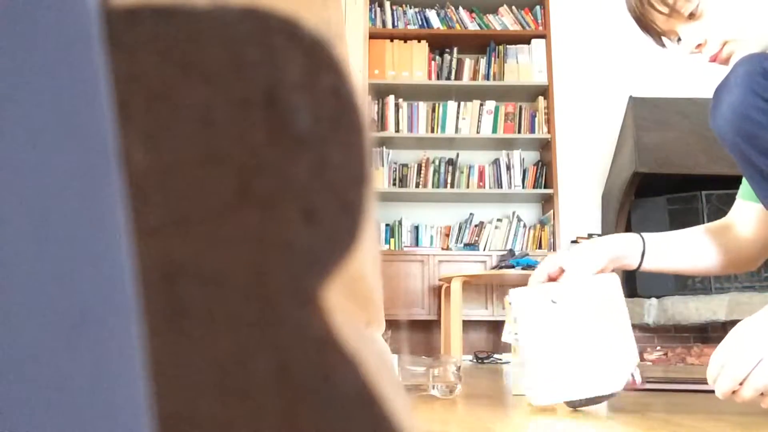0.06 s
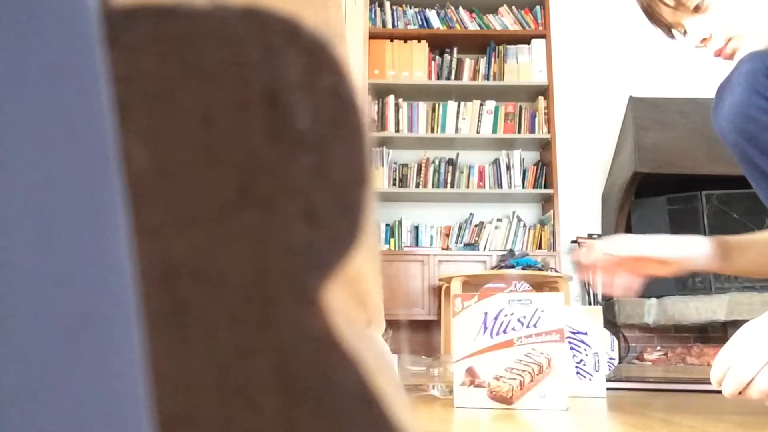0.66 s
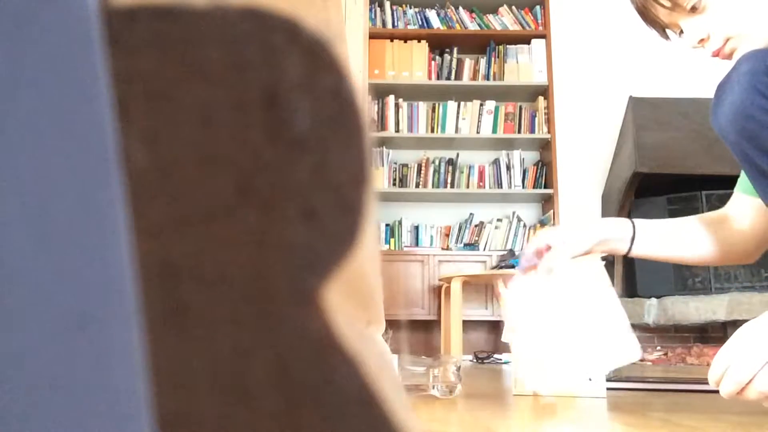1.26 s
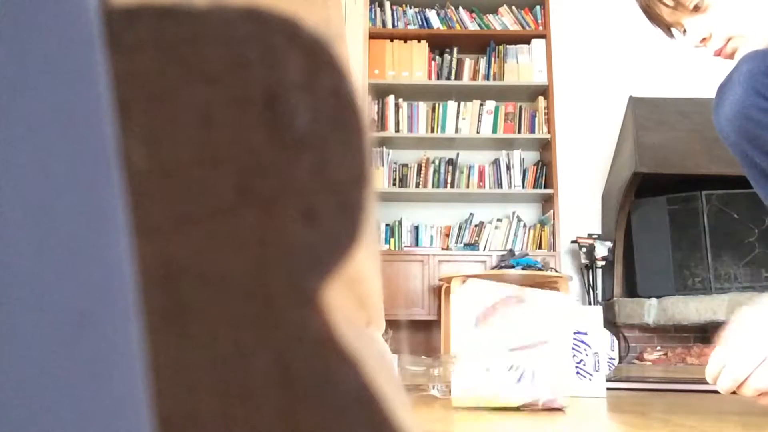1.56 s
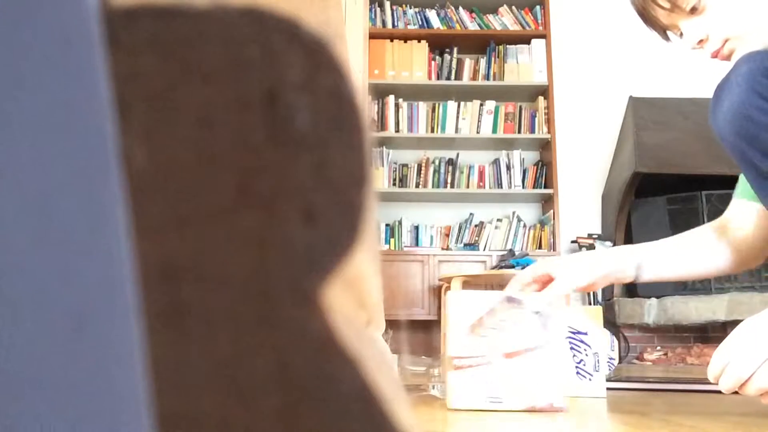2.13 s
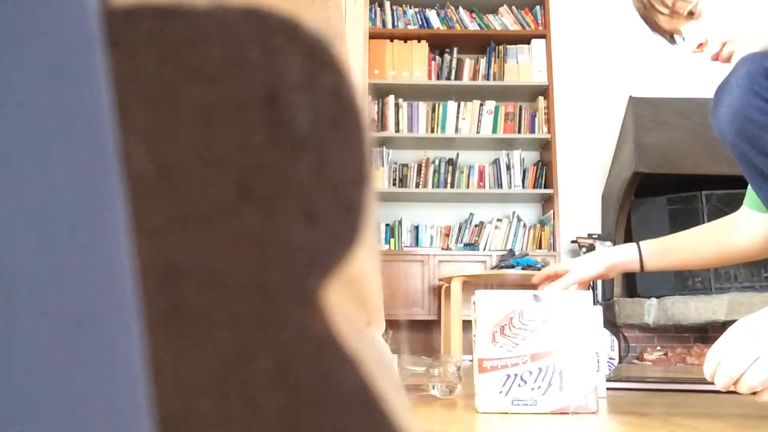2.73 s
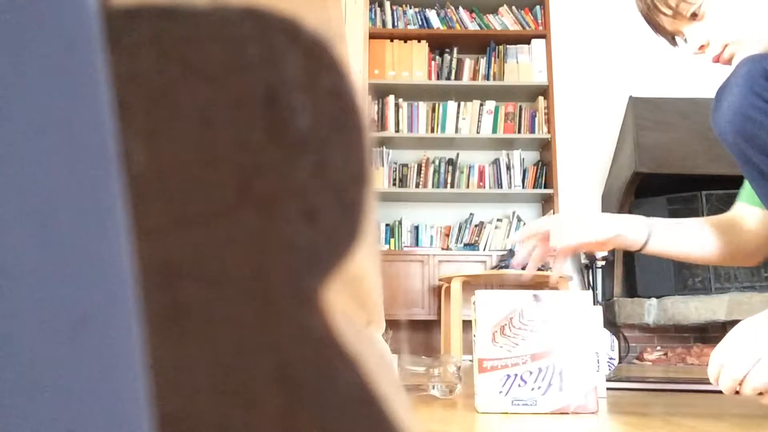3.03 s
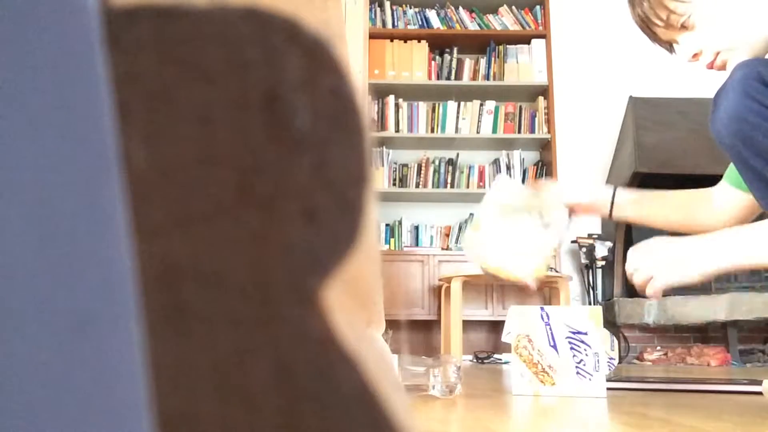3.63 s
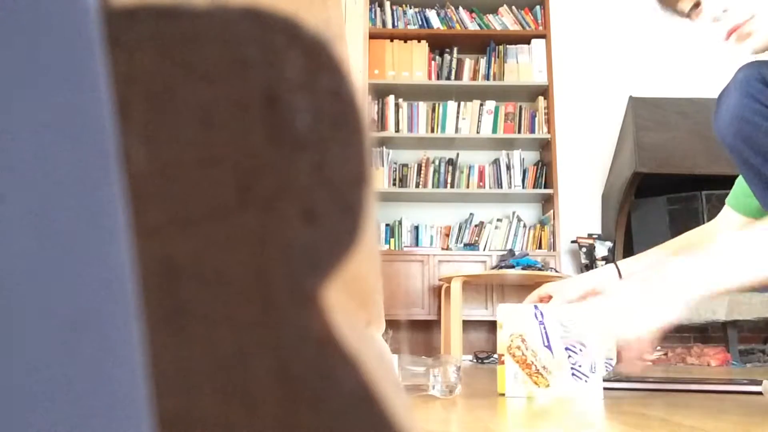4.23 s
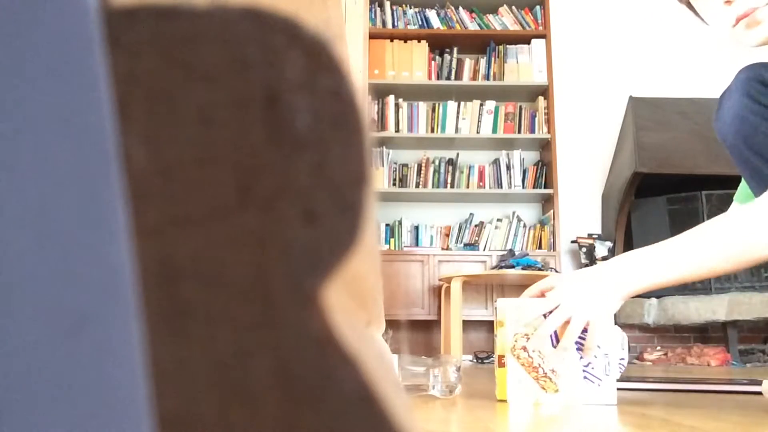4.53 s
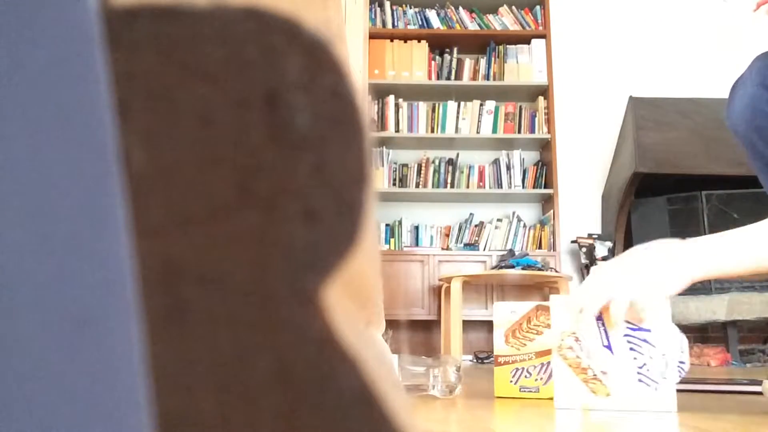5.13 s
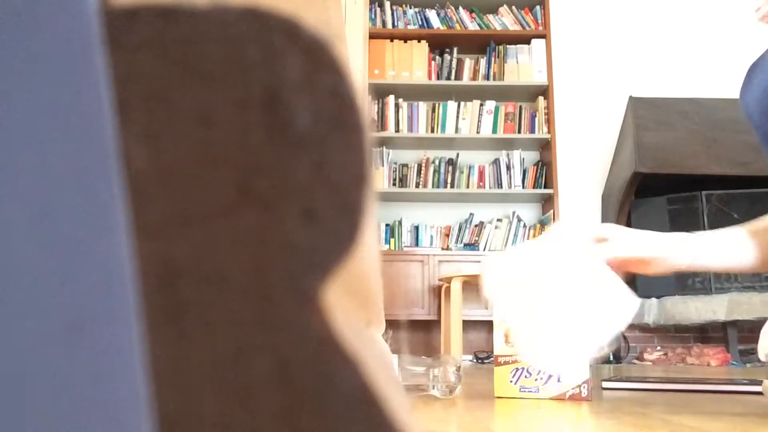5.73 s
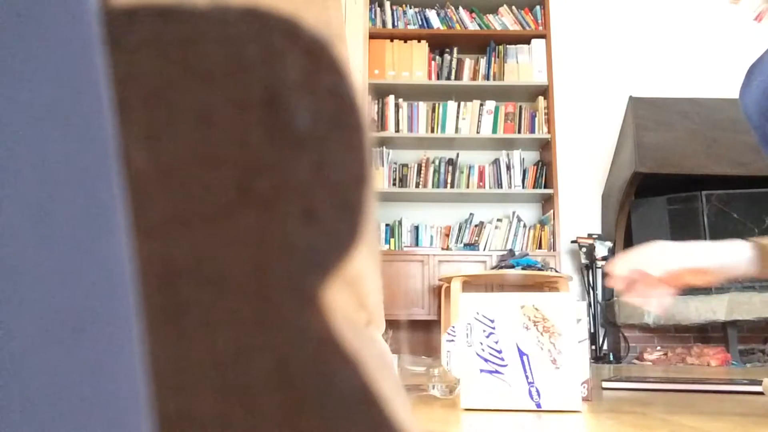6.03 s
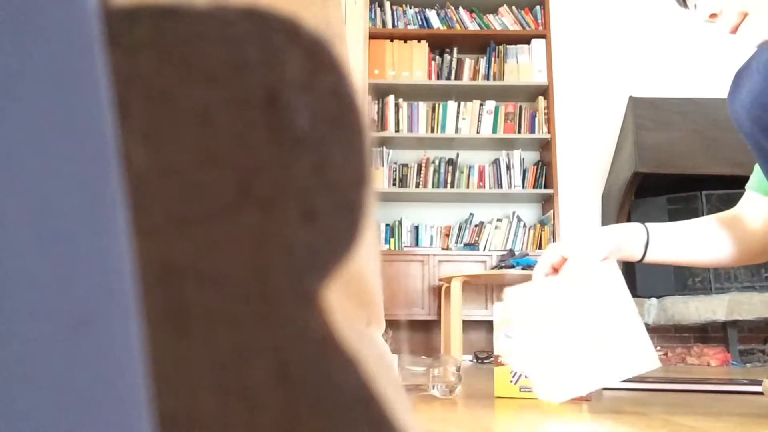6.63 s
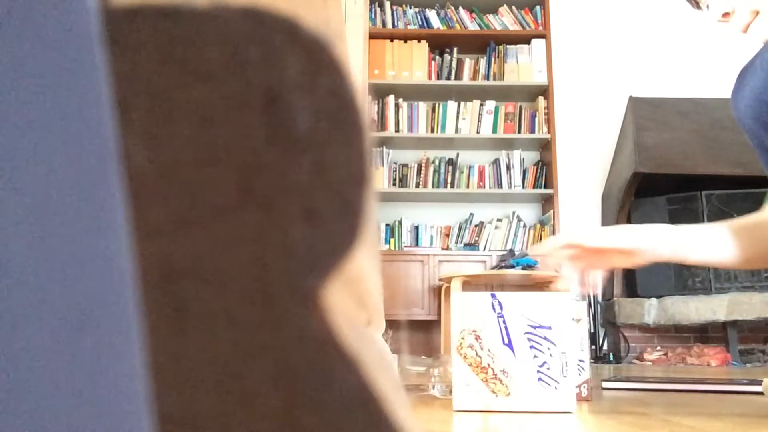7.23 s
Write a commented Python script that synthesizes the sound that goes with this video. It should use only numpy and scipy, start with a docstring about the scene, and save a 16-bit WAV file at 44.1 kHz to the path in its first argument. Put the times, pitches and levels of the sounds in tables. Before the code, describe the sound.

A cardboard box of wrapped bars clatters onto a wooden floor four times, with soft finger taps and sliding in between.

```python
"""Fingers brush and tap a cardboard box of wrapped cereal bars, then it clatters onto a wooden floor.
Each of four landings is a quick cluster of edge blows: the carton rings, the boards thump, the
wrappers crackle. In between, fingers tap and grip the box and slide it over the floor; a second box
takes over partway. A quiet living room adds a short echo and a low murmur."""
import sys
import numpy as np
from scipy import signal
from scipy.io import wavfile
from scipy.ndimage import uniform_filter1d

SR = 44100
rng = np.random.default_rng(int(sys.argv[2]) if len(sys.argv) > 2 else 0)


def master(y):
    """Save y as 16-bit WAV."""
    cut = np.clip(np.atleast_2d(y).T, -1, 1)
    pcm = np.round(cut * 32767)  # scale
    wavfile.write(sys.argv[1], SR, pcm.astype(np.int16))


N = 321048

# edges and faces meeting the floor:
# (time [s], carton [dB], contact hardness [Hz], crunch [dB], floor thump [dB], wrapper crackle [dB])
EDGE_BLOWS = [(0.4822, -14, 600, -34.5, -33.5, -43), (0.4877, -29, 1000, -31, -35, -31.5),
              (.5021, -31, 900, -33, -48, -38.5), (0.5267, -36.5, 2000, -42.5, -44, -43),
              (.5397, -22.5, 600, -40, -28.5, -40), (0.5438, -21.5, 1000, -39, -48, -49),
              (1.6118, -43.5, 2500, -45, -56, -41), (1.625, -17.5, 1700, -33.5, -30, -41.5),
              (1.6286, -15.5, 1498, -29.5, -36.5, -30.5), (1.6346, -28.5, 1200, -45, -50, -36.5),
              (1.6487, -16.5, 1300, -37.5, -31.5, -44.5), (5.9854, -18.5, 2200, -23.5, -35.5, -38),
              (5.9871, -18.5, 1200, -31, -23.5, -38.5), (5.99, -23, 1500, -36, -29.5, -35),
              (5.997, -24.5, 900, -31, -30, -42), (6.0041, -25, 1500, -38, -32, -45),
              (6.9542, -25, 150, -63, -39.5, -49), (6.964, -40, 1500, -38.5, -44.5, -44.5),
              (7.0177, -22.5, 6360, -30.5, -38.5, -29.5), (7.021, -26, 700, -41, -39, -53),
              (7.0237, -19, 500, -39.5, -42, -60)]
def landings():
    """The box lands edge after edge; after a cluster's last blow it hops weakly and the bars settle."""
    cluster_gap_s, hop_s, hop_db, settle_db = .045, .013, -16, -1
    out = np.zeros(N)
    gaps_s = np.diff([row[0] for row in EDGE_BLOWS], append=np.inf)
    for (s, db, hard_hz, crunch_db, thump_db, crackle_db), gap_s in zip(EDGE_BLOWS, gaps_s):
        add(out, s, edge_blow(s, db, hard_hz, crunch_db, thump_db, crackle_db))
        if gap_s > cluster_gap_s:
            hop = edge_blow(s, db + hop_db, hard_hz, crunch_db + settle_db,
                            thump_db + hop_db, crackle_db + settle_db)
            add(out, s + hop_s, hop)
    return out


# spectra of thudding bars, crushed cardboard and wrappers: (frequency [Hz], gain [dB])
THUD_SPECTRUM = [(60, -28.5), (150, -11.5), (300, -8.5), (550, 1.5), (900, -3.5), (1400, -18),
                 (3000, -39.5), (8000, -61)]
CRUNCH_SPECTRUM = [(250, -19.5), (600, 1.5), (1000, 2), (1400, 1), (1750, -11.5), (2300, -3.5),
                   (3000, -11.5), (3850, -14), (5200, -20), (9000, -27)]
WRAPPER_SPECTRUM = [(300, -18.5), (1200, 7), (2500, 0), (3800, 0.5), (4900, -4.5), (6400, -3.5),
                    (7800, -3.5), (10000, -2), (12500, -10), (13800, -14.5), (15000, -16.5)]
def edge_blow(s, db, hard_hz, crunch_db, thump_db, crackle_db):
    """A blow rings carton and boards and crunches the cardboard; the bars thud, their wrappers crackle."""
    snap_s = np.clip(4 / hard_hz, .0006, .0035)  # harder contact, faster snap
    hollow = highpassed(softened(carton(s, damping=1.6), hard_hz), hz=199)
    thud = burst(snap_s=.0041, settle_s=.016, settle_db=-10, rise_s=.00099)
    crunch = burst(snap_s=.0037, settle_s=.013, settle_db=-8.5, rise_s=.0013)
    thump = floorboards(damping=.85, scatter_db=0, low_cut_hz=85)
    crackle = burst(snap_s, settle_s=.0071, settle_db=-21, rise_s=.0012)
    crack = signal.unit_impulse(len(hollow))
    crack_db = db - 7 + 8 * np.log2(hard_hz / 6000)  # hard corners crack: 8 dB per octave of hardness
    out = sized(hollow, db)
    add(out, 0, sized(coloured(thud, THUD_SPECTRUM), db - 9))
    add(out, 0, sized(coloured(crunch, CRUNCH_SPECTRUM), crunch_db))
    add(out, 0, sized(thump, thump_db))
    add(out, 0, sized(coloured(crackle, WRAPPER_SPECTRUM), crackle_db))
    add(out, 0, sized(coloured(crack, WRAPPER_SPECTRUM), crack_db))
    return out


# modes of the two filled cartons: (frequency [Hz], weight [dB], nominal t60 [s])
FIRST_CARTON_MODES = [(230, -16.5, 0.043), (325.2, -18.5, 0.092), (380, -13, 0.13), (429, -10.5, 0.14),
                      (489.3, 0.5, 0.048), (591, 4.5, .03), (619.5, -6.5, .12), (719.3, 2, 0.078),
                      (771, -12.5, 0.023), (938, -10, 0.027), (1066, -6.5, .09), (1260, -13, 0.067),
                      (1315, -14, 0.075), (1550, -15.5, 0.028), (1662, -23, .05)]
SECOND_CARTON_MODES = [(214, -9, 0.097), (290.5, -11, 0.08), (347, 4.5, 0.036), (447, -9.5, 0.069),
                       (551, -11, 0.036), (602, 2, 0.039), (732, -10, 0.058), (854, -3.5, 0.027),
                       (885, -13.5, .07), (1010, -16.5, 0.14), (1390, -15.5, 0.058), (1510, -9, 0.023),
                       (2010, -7, 0.11), (2370, -27, .04), (2870, -8.5, 0.053)]
def carton(s, damping):
    """Ring of the carton in hand at time s; cardboard is lossy, so high modes die early."""
    swap_s, max_cycles = 4.5, 79.5
    modes = FIRST_CARTON_MODES if s < swap_s else SECOND_CARTON_MODES
    lossy_modes = [(hz, db, min(t60, max_cycles / hz)) for hz, db, t60 in modes]
    return ring(lossy_modes, damping, scatter_db=3.5, longest_s=.11)


# floorboard modes: (frequency [Hz], weight [dB], nominal t60 [s])
BOARD_MODES = [(64, -12.5, 0.14), (100, -4, .2), (145, -0.5, .09), (173.8, 4, 0.062)]
def floorboards(damping, scatter_db, low_cut_hz):
    """Struck boards thump in a few low modes."""
    return highpassed(ring(BOARD_MODES, damping, scatter_db, longest_s=.13), low_cut_hz)


# fingers and light bumps on a carton, tick and crackle before their trims in tap():
# (time [s], tick [dB], tick pitch [Hz], body knock [dB], wrapper crackle [dB])
FINGER_TAPS = [(.262, -38.5, 2350, -71, -49), (.353, -34.5, 755.4, -64.5, -54), (.93, -45, 622, -58, -62),
               (.972, -45, 700, -44.5, -58), (1.04, -48.5, 616, -60.5, -63), (1.418, -45, 1328, -70, -66.5),
               (2.133, -36, 594.8, -38.5, -53), (2.151, -26, 727, -47.5, -51),
               (2.334, -42.5, 711, -56.5, -58.5), (3.241, -32, 752, -44.5, -64),
               (3.253, -36.5, 840, -45, -49), (3.304, -43, 729, -60, -51), (3.353, -47.5, 791, -58, -46.5),
               (3.51, -47, 1050, -62, -53.5), (3.944, -48.5, 616, -54, -70), (4.006, -51, 703.7, -51, -68),
               (4.044, -33, 750, -44, -75), (4.29, -52, 762, -50.5, -64), (4.406, -42, 755, -59, -55.5),
               (4.48, -29, 878, -43, -63), (4.768, -49, 729, -53.5, -65), (4.885, -44, 714, -51.5, -59.5),
               (4.951, -48, 619.7, -63, -53.5), (5.2, -34.5, 630, -43.5, -55.5),
               (5.57, -51.5, 651.7, -57, -74.5), (5.641, -52.5, 1060, -62.5, -73),
               (5.884, -22, 990, -46, -41), (6.364, -50, 607, -59, -65), (6.403, -36.5, 1010, -48, -55.5),
               (6.437, -37.5, 623, -56, -47.5), (6.805, -36, 729, -53, -67.5), (6.87, -36, 1176, -64, -48),
               (6.887, -29.5, 744, -45, -39.5), (6.896, -28.5, 1104, -52, -61)]
def taps():
    """Separate touches on the carton."""
    out = np.zeros(N)
    for s, *touch in FINGER_TAPS:
        add(out, s, tap(s, *touch))
    return out


def tap(s, tick_db, hz, knock_db, crackle_db):
    """A touched spot ticks at its own pitch; the finger-damped carton knocks, the wrappers stir."""
    firm_db = -46.5  # firmer knocks press through to the floor more and more
    thump_db = knock_db - 5.5 + .78 * (knock_db - firm_db)
    contact = coloured(burst(snap_s=.0035, settle_s=.0078, settle_db=-14.5, rise_s=.0018), CRUNCH_SPECTRUM)
    tick = resonate(contact, hz, width_hz=280) + .15 * contact
    knock = highpassed(softened(carton(s, damping=1.4), hard_hz=240), hz=185)
    thump = floorboards(damping=1.6, scatter_db=3, low_cut_hz=71.1)
    crackle = burst(snap_s=.0022, settle_s=.0084, settle_db=-14.5, rise_s=.0012)
    out = sized(knock, knock_db - .5)
    add(out, 0, sized(tick, tick_db - 12.5))
    add(out, 0, sized(thump, thump_db))
    add(out, 0, sized(coloured(crackle, WRAPPER_SPECTRUM), crackle_db - 7))
    return out


# carton sliding under the hand or over the floor:
# (start [s], length [s], relative rub level [dB], relative hiss level [dB])
SLIDE_STROKES = [(0, 0.017, -57.5, -67.5), (0.149, 0.026, -57.5, -70.5), (0.267, 0.093, -54, -68.5),
                 (0.933, 0.092, -52.5, -69.5), (1.171, 0.088, -64.5, -75.5), (1.41, 0.066, -57.5, -71.5),
                 (2.186, 0.079, -50.5, -55), (2.31, .12, -61, -86.5), (3.292, .09, -52, -63.5),
                 (3.411, 0.11, -62, -78), (3.967, 0.19, -54.5, -68), (4.161, 0.072, -53.5, -59),
                 (4.3, .2, -51.5, -59), (4.524, 0.15, -62.5, -81.5), (4.682, 0.12, -55.5, -65),
                 (4.861, .18, -57, -64.5), (5.097, 0.13, -52, -68), (5.282, 0.033, -50, -59.5),
                 (5.347, 0.16, -66.5, -69), (5.5, 0.21, -68.5, -79), (5.785, .09, -49.5, -59.5),
                 (6.379, 0.058, -56, -67), (6.522, .11, -63.5, -82), (6.682, 0.11, -65.5, -74),
                 (6.799, .13, -51.5, -65.5)]
# spectra of coarse and fine friction: (frequency [Hz], gain [dB])
RUB_SPECTRUM = [(120, -40), (200, -4), (339, 1.5), (463, -16), (588, -1), (814, -1.5), (946, -8),
                (1310, -8), (1840, -16), (3190, -18), (4000, -27), (5200, -53), (8800, -120)]
HISS_SPECTRUM = [(1650, -28.5), (2800, -3), (3550, -5), (4060, -4), (5900, -5.5), (7470, -3.5),
                 (9590, -3.5), (13100, -12), (15500, -12.5)]
def slides():
    """Friction: coarse slips sound the carton, fine ones hiss on its surface, wrappers crinkle inside."""
    rise_share, coast_s = .4, .062
    age_s = np.arange(SR) / SR
    rub_level, hiss_level = np.zeros((2, N))
    for start_s, length_s, rub_db, hiss_db in SLIDE_STROKES:
        push = np.minimum(age_s / (rise_share * length_s), 1)
        speed = push * np.exp(-np.maximum(age_s - length_s, 0) / coast_s)
        add(rub_level, start_s, amp(rub_db) * speed)
        add(hiss_level, start_s, amp(hiss_db) * speed)
    pressure = amp(1.94 * evened(uniform_filter1d(rng.standard_normal(N), size=700)))
    rub = amp(-5.5) * evened(coloured(grains(N, per_s=2300, spread_db=2.5), RUB_SPECTRUM))
    hiss = amp(-5) * evened(coloured(grains(N, per_s=22000, spread_db=5.5), HISS_SPECTRUM))
    crinkle = amp(-10.5) * evened(coloured(grains(N, per_s=130, spread_db=3), WRAPPER_SPECTRUM))
    return pressure * (rub_level * rub + hiss_level * (hiss + crinkle))


def catches():
    """Fingertips catch faintly at random points of a stroke."""
    per_s, above_rub_db, spread_db = 11, 8, 2
    out = np.zeros(N)
    for start_s, length_s, rub_db, _ in SLIDE_STROKES:
        for place, strength in rng.random((round(length_s * per_s), 2)):
            s = start_s + place * length_s
            db = rub_db + above_rub_db + spread_db * (2 * strength - 1)
            add(out, s, tap(s, tick_db=db, hz=800, knock_db=db - 8, crackle_db=db - 18))
    return out


# cardboard scuffs: (time [s], length [s], level [dB], centre pitch [Hz])
CARDBOARD_SCUFFS = [(.301, 0.04, -52.5, 736), (1.607, .016, -39, 864), (2.126, 0.035, -53, 1990),
                    (2.227, 0.064, -57, 2320), (3.209, 0.05, -58.5, 723), (3.309, 0.0058, -51.5, 3320),
                    (3.342, 0.08, -57, 1600), (3.52, 0.15, -71.5, 2006), (4.435, 0.057, -52, 1120),
                    (4.682, 0.014, -48, 647), (4.898, 0.038, -46.5, 640), (5.296, 0.033, -49, 1250),
                    (5.803, 0.026, -58, 2260), (5.872, 0.013, -52, 3520)]
def scuffs():
    """Brief stick and slip rings one broad, sinking resonance of the cardboard."""
    glide_ratio = 1.06
    out = np.zeros(N)
    for s, length_s, db, pitch_hz in CARDBOARD_SCUFFS:
        size = int(length_s * SR)
        hz = np.geomspace(pitch_hz * glide_ratio, pitch_hz / glide_ratio, size)
        width_hz = pitch_hz * .62
        slips = grains(size, per_s=2000, spread_db=.5)
        tone = resonate(resonate(slips, hz, width_hz), hz, width_hz)
        add(out, s, amp(db) * evened(tone) * signal.windows.tukey(size, .5))
    return out


def directions(x, count=3, turn_s=.024):
    """A tumbling box radiates now this way, now that: shares of the sound whose powers sum to 1."""
    turns = np.arange(N) / SR / turn_s
    facing = np.arange(count)[:, None] / count
    shares = np.maximum(np.cos(2 * np.pi * (turns - facing)), 0)
    return x * shares / np.linalg.norm(shares, axis=0)


# room decay: (frequency [Hz], t60 [s])
ROOM_DECAY = [(100, 0.43), (300, 0.6), (600, 0.46), (1500, 0.6149), (3000, 0.4858), (7000, 0.49),
              (14000, 0.31)]
# echo colour: (frequency [Hz], gain [dB])
ECHO_SPECTRUM = [(50, -13), (100, 2.5), (240, -3.5), (400, 1), (600, -5), (1000, -6), (3000, -4),
                 (10000, -7.5)]
def room(x, wet_db, early_db, early_s):
    """Dense early echoes off floor and furniture, then a tail whose treble dies first."""
    t = np.arange(SR) / SR
    arrived = t > .004
    echoes = rng.choice([-1., 1.], SR) * (rng.random(SR) < 4000 / SR) * arrived
    hz, frame_s, bands = signal.stft(echoes, SR, nperseg=256)
    decay = amp(-60 * frame_s / read(ROOM_DECAY, hz)[:, None])
    tail = signal.istft(bands * decay, SR, nperseg=256)[1][:SR] * np.minimum(t / .0051, 1)
    early = rng.permutation(echoes) * np.exp(-t / early_s) * arrived
    response = amp(wet_db) * tail / np.linalg.norm(tail) + amp(early_db) * early / np.linalg.norm(early)
    return signal.fftconvolve(x, coloured(response, ECHO_SPECTRUM))[:N]


# room air: (frequency [Hz], gain [dB])
AIR_SPECTRUM = [(15, -51.5), (25, -30), (46, -18.5), (101, -6.5), (133, -16.5), (164, -13.5), (233, -21),
                (410, -18), (684, -28), (1380, -32.5), (2010, -35), (4040, -39.5), (5730, -40),
                (13500, -45), (15500, -45)]
def ambience(rms_db):
    """The low murmur of air in a quiet room, with a faint hiss."""
    return amp(rms_db) * evened(coloured(rng.standard_normal(N), AIR_SPECTRUM, size=8192))


def ring(modes, damping, scatter_db, longest_s, size=12000):
    """Dying modes; their weights scatter with the spot that is struck."""
    hz, db, t60 = np.transpose(modes)[:, :, None]
    t = np.arange(size) / SR
    weight_db = db + scatter_db * rng.standard_normal(db.shape)
    life_s = np.minimum(t60 / damping, longest_s)
    return (amp(weight_db - 60 * t / life_s) * np.sin(2 * np.pi * hz * t)).sum(0)


def burst(snap_s, settle_s, settle_db, rise_s, size=5000):
    """Tiny buckles that build up on a jolt and then settle."""
    t = np.arange(size) / SR
    fade = np.exp(-t / snap_s) + amp(settle_db) * np.exp(-t / settle_s)
    return grains(size, per_s=9000, spread_db=4) * fade * (1 - np.exp(-t / rise_s))


def grains(length, per_s, spread_db):
    """A train of tiny slips of uneven size."""
    size = amp(spread_db * np.minimum(rng.exponential(1, length), 4))
    return evened(size * rng.choice([-1, 1], length) * (rng.random(length) < per_s / SR))


def softened(x, hard_hz):
    """A soft contact lasts longer and leaves the high modes quiet."""
    pole = np.exp(-2 * np.pi * hard_hz / SR)
    return signal.lfilter([1 - pole], [1, -pole], x)


def highpassed(x, hz):
    """Small surfaces radiate little below this frequency."""
    return signal.sosfilt(signal.butter(2, hz, "high", fs=SR, output="sos"), x)


def resonate(x, hz, width_hz):
    """Unity-gain resonance that can follow a pitch curve."""
    turn = np.exp(2j * np.pi * np.cumsum(hz * np.ones(len(x))) / SR)
    pole = np.exp(-np.pi * width_hz / SR)
    return 2 * (turn * signal.lfilter([1 - pole], [1, -pole], x / turn)).real


def coloured(x, spectrum, size=2048):
    """Minimum-phase filter with the given spectrum."""
    gain_db = np.maximum(read(spectrum, abs(np.fft.fftfreq(size, 1 / SR))), -100)
    log_response = np.conj(signal.hilbert(np.log(amp(gain_db))))
    kernel = np.fft.ifft(np.exp(log_response)).real
    return signal.oaconvolve(x, kernel)[:len(x)]


def read(points, hz):
    """Linear interpolation on a log-frequency axis."""
    point_hz, value = np.transpose(points)
    return np.interp(np.log(hz + 1), np.log(point_hz + 1), value)


def amp(db):
    return 10 ** (np.asarray(db) / 20)


def evened(x):
    """Scales to rms 1."""
    return x / np.sqrt(np.mean(x ** 2) + 1e-20)


def sized(x, db):
    """Scales a blow to the energy of 10 ms at the given level."""
    return amp(db) * x * np.sqrt(SR / 100 / (np.sum(x ** 2) + 1e-20))


def add(mix, s, sound):
    """Mixes a sound in at time s."""
    part = mix[max(round(s * SR), 0):][:len(sound)]
    part += sound[:len(part)]


def scene():
    """The boxes, one room echo per direction and the air, in mono."""
    air = ambience(rms_db=-67.5)
    boxes = landings() + slides() + scuffs() + taps() + catches()
    echo = sum(room(part, wet_db=-11, early_db=-5.5, early_s=.036) for part in directions(boxes))
    return (boxes + echo + air)[None]


def record(dry):
    """A small microphone rounds the highest peaks; a low-pass limits the band."""
    ceiling, edge_hz = .82, 15450
    rounded = ceiling * np.tanh(dry / ceiling)
    lowpass = signal.firwin(255, edge_hz, window=("kaiser", 9), fs=SR)
    return signal.oaconvolve(rounded, lowpass[None], "same")


dry = scene()
out = record(dry)
master(out)
```